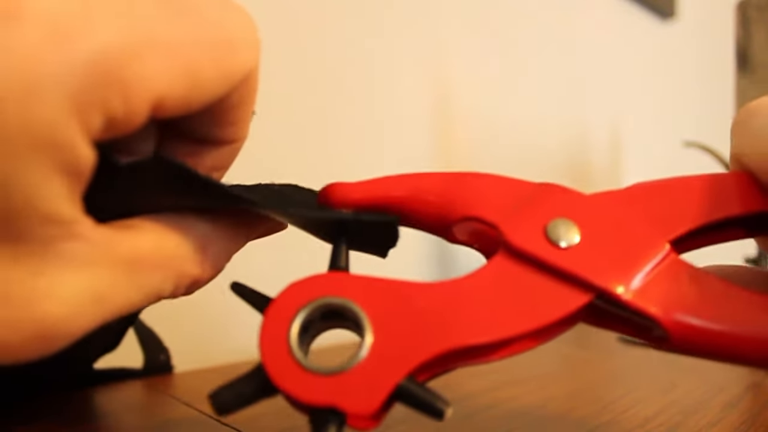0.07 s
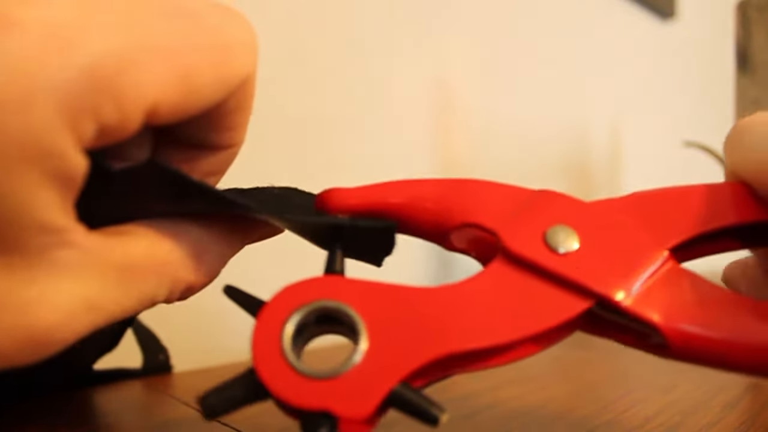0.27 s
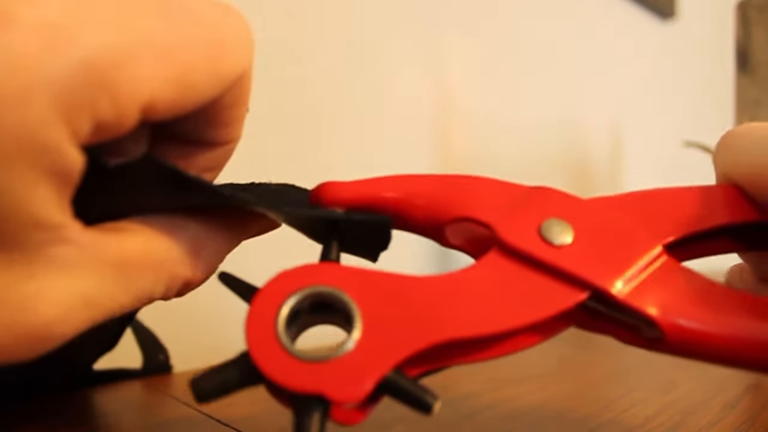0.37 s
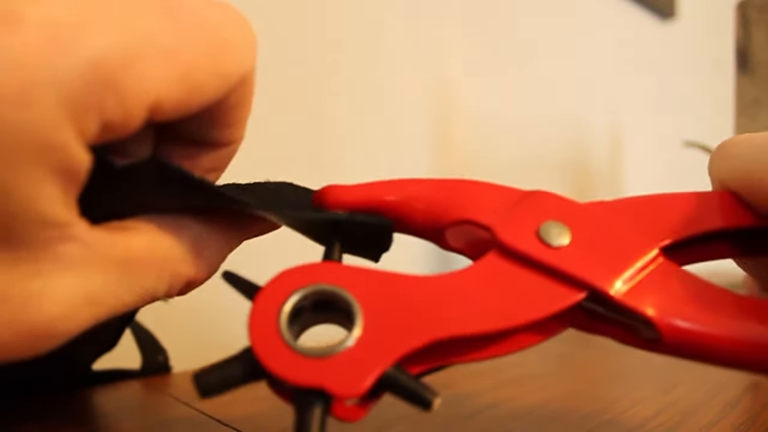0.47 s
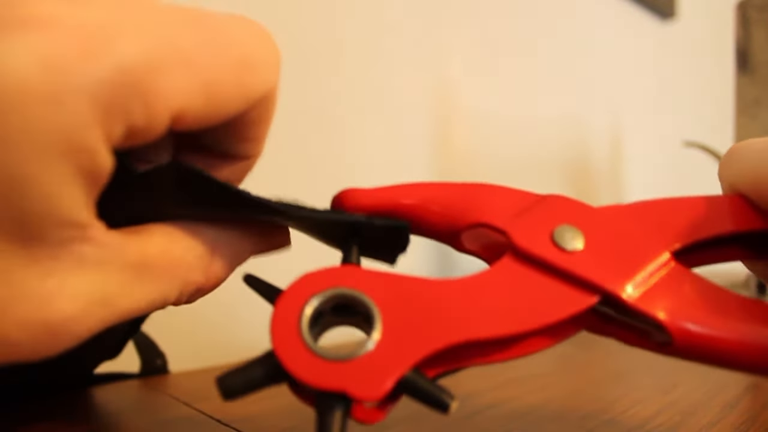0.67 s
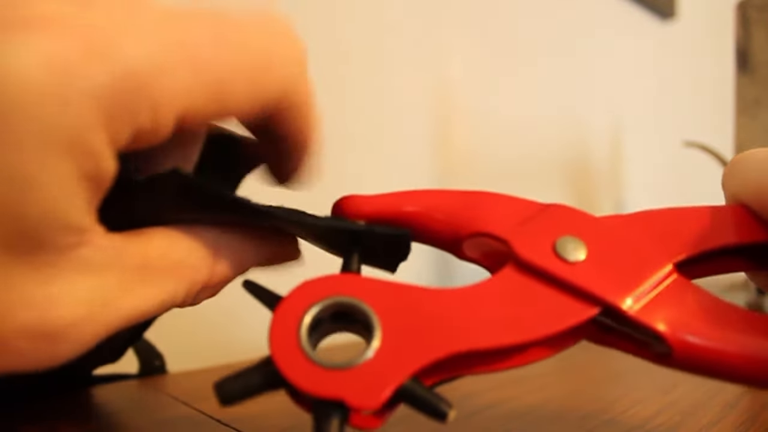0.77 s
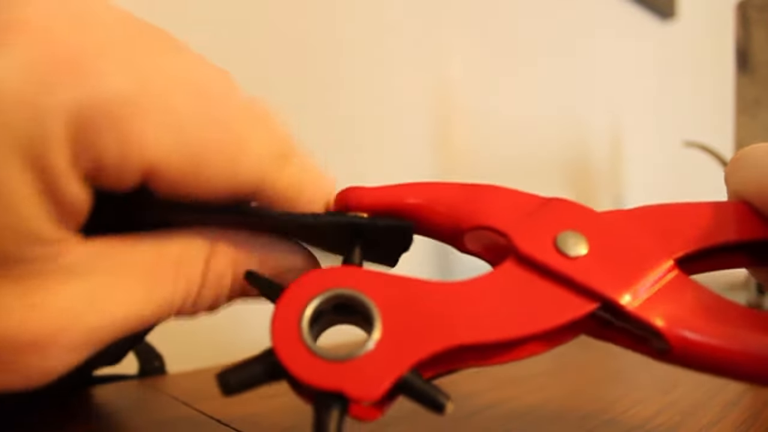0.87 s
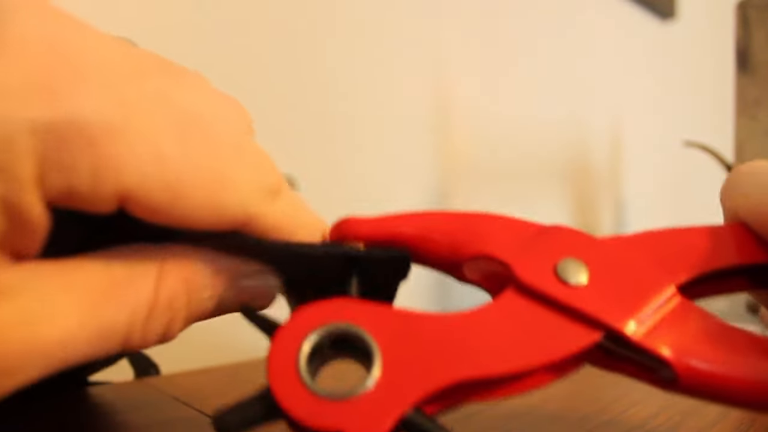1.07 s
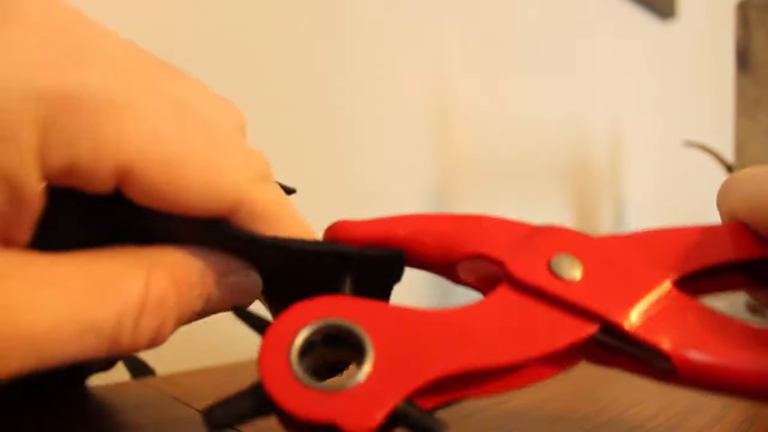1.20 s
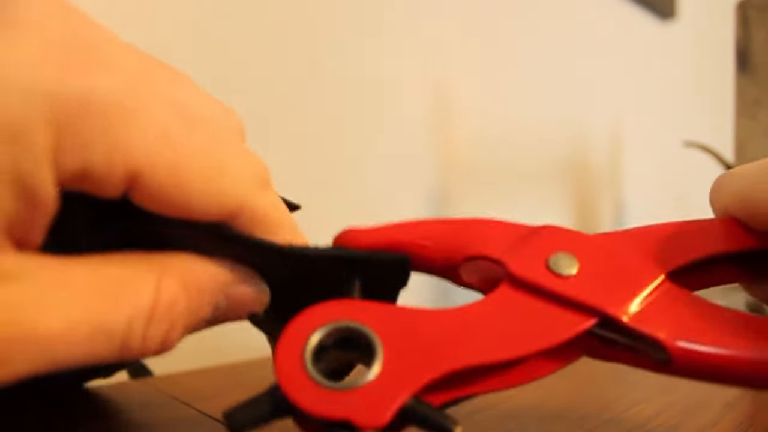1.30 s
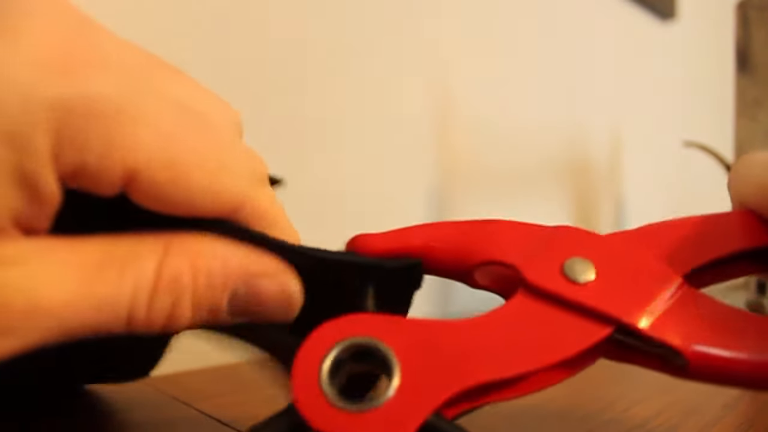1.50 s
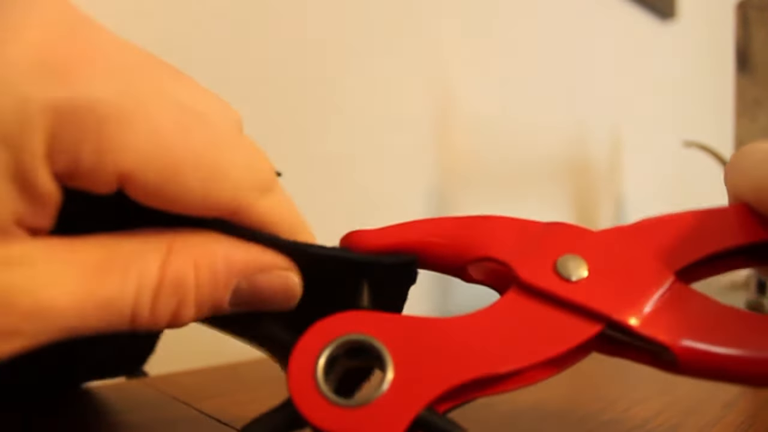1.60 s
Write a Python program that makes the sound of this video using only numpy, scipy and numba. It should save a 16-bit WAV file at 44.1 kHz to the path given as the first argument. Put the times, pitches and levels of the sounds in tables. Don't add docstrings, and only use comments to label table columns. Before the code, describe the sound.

A pliers-type hole punch bites leather close to the microphone in a small room. Faint ticks lead to jerky, gritty clicks from 0.19 seconds, a sharp crack at 0.28 and the loudest steel snap at 0.33, with a tiny bounce and short bright room ring. Hum and hiss duck, then creep back. Soft rubs and creaks follow from 0.7, a click at 0.96, stronger rustling near 1.4-1.5, and dull knocks to 1.65.

```python
import sys
import numpy as np
from scipy import signal
from scipy.fft import rfft, irfft
from scipy.io import wavfile
from scipy.ndimage import uniform_filter1d
from numba import njit

SR = 44100
rng = np.random.default_rng(int(sys.argv[2]) if len(sys.argv) > 2 else 0)


def wrap_up_sound(samples):
    columns = np.atleast_2d(samples).T
    tamed = np.clip(columns, -1, 1)
    steps = np.round(tamed * 32767).astype(np.int16)
    wavfile.write(sys.argv[1], SR, steps)


def boost(x):
    u = np.asarray(x, float) / 20
    return 10 ** u


N = 72765


@njit
def svf(x, hz, width):
    y, b, l = np.empty(len(x)), 0., 0.
    g, k = np.tan(np.pi * hz / SR), width / hz
    for i in range(len(x)):
        v = (b + g * (x[i] - l)) / (1 + g * (g + k))
        b, l, y[i] = 2 * v - b, l + 2 * g * v, k * v
    return y


def resonate(x, peaks):
    out = 0
    for k, (hz, width, db) in enumerate(peaks):
        mode = svf(x, 1. * hz, 1. * width) * np.sqrt(500 / width)
        out = out + (-1) ** k * boost(db) * mode
    return out


def level(x, db):
    return x * boost(db) / np.sqrt(np.mean(x ** 2))


def colour(x, points):
    p = np.array(points, float)
    hz = np.arange(N // 2 + 1) * SR / N + 1
    curve_db = np.interp(np.log(hz), np.log(p[:, 0]), p[:, 1])
    return irfft(rfft(x) * boost(curve_db), N)


def walk(rate):
    k = max(int(SR / rate), 32)
    held = np.repeat(rng.standard_normal(N // 16)[:N // k + 1], k)
    return uniform_filter1d(uniform_filter1d(held, k), k)[:N]


def grains(rate, spread_db):
    struck = rng.random(N) < rate / SR
    return struck * rng.standard_normal(N) * boost(spread_db * rng.exponential(size=N))


# time in seconds, gain in dB.
GAIN = [
    (0, -4),
    (.2, -4.5),
    (.26, 1),
    (.33, -17),
    (.345, -22),
    (.4, -27.5),
    (.6, -26.5),
    (.9, -22),
    (1.2, -16),
    (1.65, -10),
]


def gain_db(t):
    return np.interp(t, *np.array(GAIN, float).T)


def hits(table, voice):
    out, t = np.zeros(N + 2048), np.arange(2048) / SR
    grit = rng.standard_normal((len(table), 2048))
    for (s, db, contact_ms, *tone), g in zip(table, grit):
        since = t - s % (1 / SR)
        u = since * 1000 / max(contact_ms, .1)
        strike = 3 * np.sinc(since * SR - 4)
        rough = g * np.clip(u * 8, 0, 1) * np.exp(-np.abs(u) ** 2)
        y = voice(strike + rough, *np.array(tone, float))
        i = int(s * SR)
        out[i:i + 2048] += y / np.abs(y).max() * boost(db - gain_db(s))
    return out[:N]


def room(x):
    t60_s, damp_hz, lowest_hz = 0.47, 17000, 900
    t = np.arange(SR // 2) / SR
    tail = np.zeros(len(t))
    for hz in lowest_hz * 2 ** (np.arange(13) / 3):
        decay = boost(-60 * t * (1 + (hz / damp_hz) ** 2) / t60_s)
        tail += svf(rng.standard_normal(len(t)), hz, hz / 3) * decay
    tail *= t > .004
    return signal.fftconvolve(x, tail / np.sqrt(np.sum(tail ** 2)))[:N]


# frequency in Hz, density in dB per Hz.
AIR = [(15, -52), (25, -21.5), (117, -12), (206, -15.5), (575, -12.5), (695, -20.5), (1370, -20.5),
       (1520, -22), (16000, -36)]


def air():
    hum_hz, hum_width_hz = 112, 33
    hum = svf(rng.standard_normal(N), 1. * hum_hz, 1. * hum_width_hz)
    hum = svf(hum, 1. * hum_hz, 3. * hum_width_hz)
    phase = 2 * np.pi * np.cumsum(hum_hz * (1 + .05 * walk(8))) / SR
    line = np.sin(phase) * boost(5.0 * walk(10))
    hiss = level(colour(rng.standard_normal(N), AIR), -50) * boost(2.1 * walk(16))
    return hiss + level(hum, -50) + level(line, -57)


# frequency in Hz, width in Hz, level in dB.
PIVOT = [(1150, 700, -2.5), (1770, 560, -5.5), (2480, 360, -2.5), (3332, 560, -3.5), (4130, 350, -9.5),
         (5100, 500, -13.5), (7000, 1200, -13)]
# start in seconds, level in dB, contact in ms, pitch in Hz.
TICKS = [(.0172, -34.5, 2, 2310), (.032, -52, 1.5, 2790), (.1145, -36, 3, 2310), (.2114, -26, 1.2, 1500),
         (.2116, -38.5, 2, 350), (.33, -28, 1.5, 403.5), (.2588, -26.5, 11, 1100), (.5967, -57, 1.5, 2400),
         (.6666, -63, 2.8, 3000), (.7419, -54.5, 0.77, 6000), (.7768, -45, 3, 1800), (.815, -54, 4.2, 2200),
         (.8477, -52, 0.87, 7000), (.8746, -50, 2.6, 2200), (.959, -29, 0.97, 2900), (.3301, -18, 2, 1150),
         (1.2083, -48, 2, 2520), (1.5523, -38.5, 2.6, 2000), (1.6435, -38, 5, 1730)]


def ticks():
    def knock(x, hz):
        return svf(x + boost(1) * resonate(x, PIVOT), hz, hz / 0.64) + boost(-28) * x
    return hits(TICKS, knock)


# frequency in Hz, width in Hz, level in dB.
BODY = [(1050, 350, -27.5), (2400, 300, -20), (3520, 300, -17), (4910, 240, -1.5), (6000, 480, -5.5),
        (7900, 280, -12), (8610, 400, -13), (9750, 600, -13), (11300, 1600, -13), (12360, 700, -8),
        (14570, 900, -6.5), (15330, 740, -12)]


def steel(x, hz, width):
    return svf(x, hz, width) * np.sqrt(900 / width) + boost(-2.5) * resonate(x, BODY)


# start in seconds,
# level in dB, contact in ms, pitch in Hz, width in Hz.
SLIPS = [(.1935, -36, 3, 5500, 2350), (.2012, -32.5, .8, 5800, 1500), (.2068, -22.5, 2.5, 5600, 1500),
         (.2114, -14, 1.5, 6000, 497.7), (.2215, -32.5, 1.5, 5500, 1500), (.2255, -23.5, 2.5, 5400, 1490),
         (.2293, -18, 1.3, 5700, 1500), (.2335, -29, 3, 5500, 1500), (.2392, -35.5, 1, 5600, 1500),
         (.2474, -28, 1.2, 6000, 900), (.2514, -16, .6, 5900, 1190), (.2545, -29.5, 3, 5600, 1500),
         (.2724, -18.5, 0.79, 5340, 3000), (.2738, -19.5, 2, 5300, 2470), (.2763, -14.5, 1.5, 5600, 2060),
         (.2778, -0.5, 0.62, 6000, 600), (.2795, -17, 1.7, 5170, 500), (.287, -27.5, 1.1, 5500, 4000),
         (.9588, -29.5, 0.3, 5100, 500)]


def slips():
    return hits(SLIPS, steel)


def tear():
    start_s, end_s = .199, 0.21
    t = np.arange(N) / SR
    fibres = (rng.random(N) < 2500 / SR) * rng.standard_normal(N) * boost(3.0 * walk(300))
    burst = (t > start_s) * (t < end_s)
    return level(resonate(fibres, BODY), -43) * burst * boost(-gain_db(t))


# start in seconds, level in dB, contact in ms, pitch in Hz, width in Hz.
SNAP = [
    (.3299, 3, 0.76, 5900, 450),
    (.33, -11, 1.5, 3650, 500),
    (.3325, -0.5, 0.27, 8800, 2494),
    (.3336, -9, 2.1, 8500, 1200),
    (.3362, -26, 1, 4940, 900),
    (.3415, -28.5, 1, 8940, 1500),
]


def snap():
    return hits(SNAP, steel)


# frequency in Hz, width in Hz, level in dB.
RINGS = [(2050, 220, -5.5), (2400, 290, -1.5), (2857, 300, -10), (3337, 420, -4), (4420, 170, -7),
         (4740, 340, 2), (5500, 270, -7.5), (6050, 220, -2), (7700, 1400, -4.5), (8500, 370, 2.5),
         (9870, 500, -2), (11600, 2500, -4.5)]


def ring():
    def jolt(x, hz, width):
        return 1. * (x == x.max())
    push = hits(SNAP, jolt) + boost(-1.5) * hits(SLIPS, jolt)
    return resonate(push, RINGS) + boost(-20) * push


def punch():
    bite = tear() + slips()
    ringing = ring()
    return bite + snap() + room(boost(-14.5) * bite + boost(1.5) * ringing)


# frequency in Hz, density in dB per Hz.
LEATHER = [(120, -14.5), (200, 5), (245, -7), (558, -4), (791, -6), (1160, -3.5), (3560, -6.5), (12400, -5),
           (16000, -14)]
# frequency in Hz, width in Hz, level in dB.
HAND = [(1150, 220, 8.5), (2514, 120, -1)]
# peak in seconds, level in dB, rise in seconds, fall in seconds.
STROKES = [(.716, -59, 0.0068, 0.00673), (0.779, -63, 0.0087, 0.03), (0.897, -51, .014, 0.01),
           (.925, -61, 0.0074, 0.042), (1.069, -54, 0.075, 0.024), (1.151, -59, 0.023, 0.067),
           (1.252, -52, 0.024, .03), (1.307, -52, 0.039, 0.043), (1.385, -45, 0.013, 0.021),
           (1.454, -49, 0.0088, 0.017), (1.476, -38.5, 0.0098, 0.0079), (1.506, -47, 0.017, 0.02),
           (1.58, -59.5, .04, 0.14)]


def leather():
    t = np.arange(N) / SR
    force = np.zeros(N)
    for s, db, rise, fall in STROKES:
        force += boost(db) * np.exp(-np.abs(t - s) / np.where(t < s, rise, fall))
    rub = level(colour(grains(5000, -1), LEATHER), 0) * force * boost(1.6 * walk(180))
    grip = np.sqrt(uniform_filter1d(force, SR // 12) * boost(-57.5)) * (t > .62)
    creak = level(resonate(grains(1500, -1), HAND), -4.5) * grip * boost(2.0 * walk(59.6))
    return (rub + creak) * boost(-gain_db(t))


def scene():
    tool, hands = punch(), ticks() + leather()
    return (tool + hands + boost(-19.5) * room(hands) + air())[None]


def roll_off(x):
    return signal.sosfilt(signal.butter(12, 16470, fs=SR, output="sos"), x)


def record(dry):
    gained = dry * boost(gain_db(np.arange(N) / SR))
    band_limit = signal.ellip(7, .2, 40, 15750, fs=SR, output="sos")
    mix = np.clip(signal.sosfilt(band_limit, gained), -1, 1)
    return roll_off(mix)


dry = scene()
out = record(dry)
wrap_up_sound(out)
```